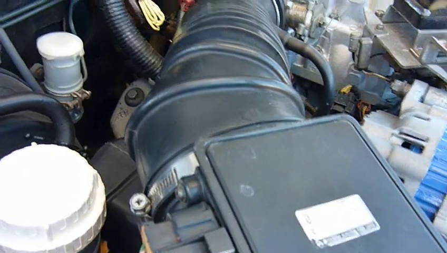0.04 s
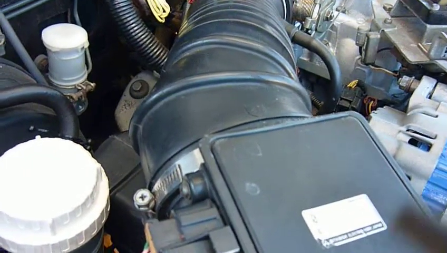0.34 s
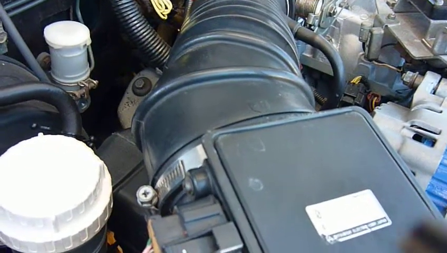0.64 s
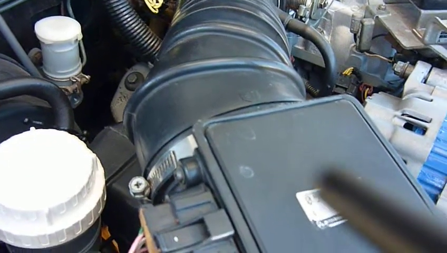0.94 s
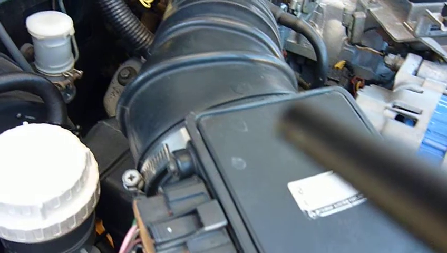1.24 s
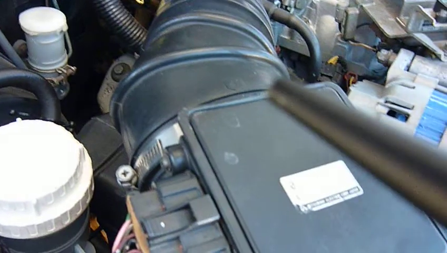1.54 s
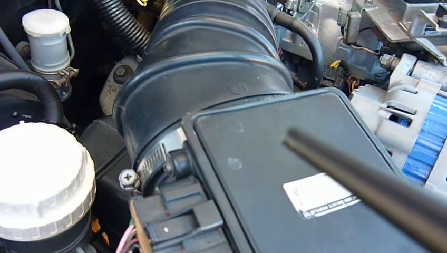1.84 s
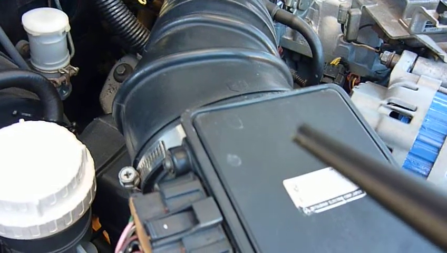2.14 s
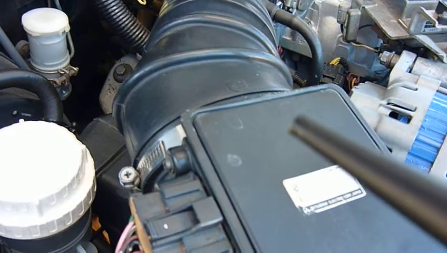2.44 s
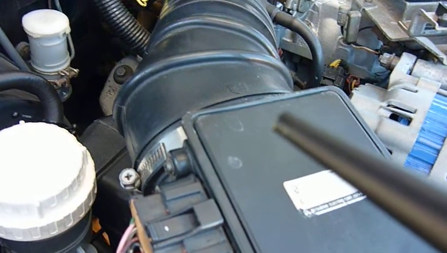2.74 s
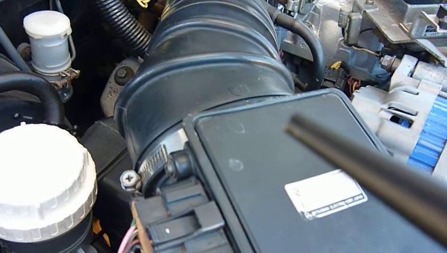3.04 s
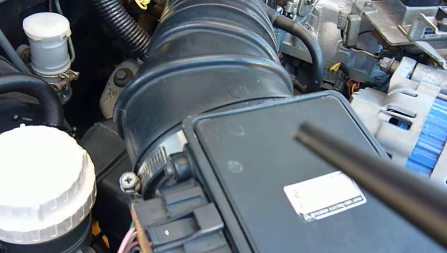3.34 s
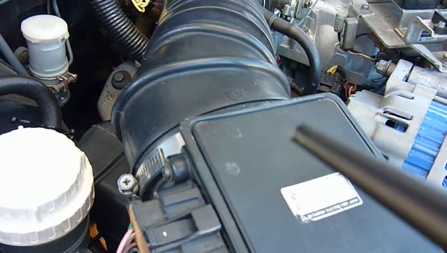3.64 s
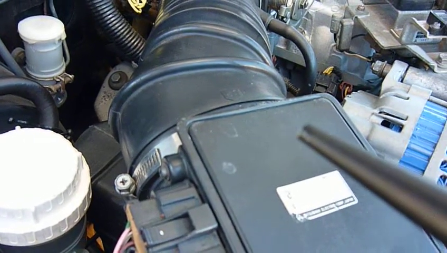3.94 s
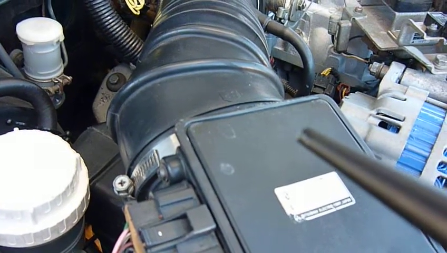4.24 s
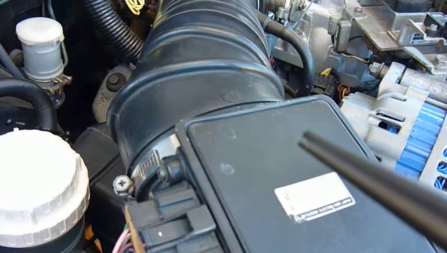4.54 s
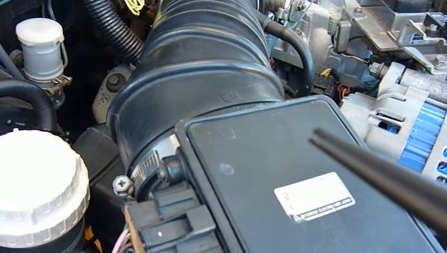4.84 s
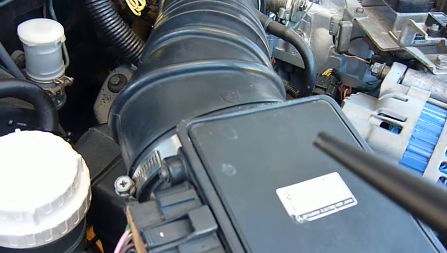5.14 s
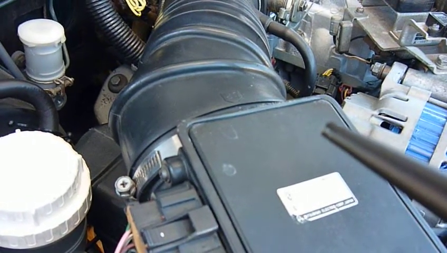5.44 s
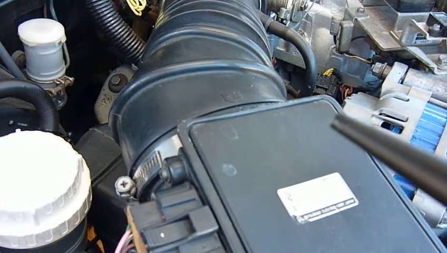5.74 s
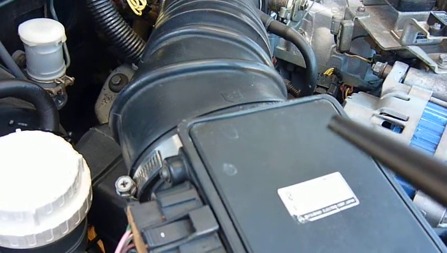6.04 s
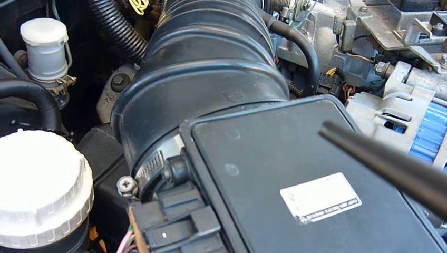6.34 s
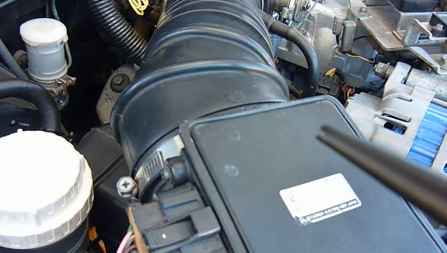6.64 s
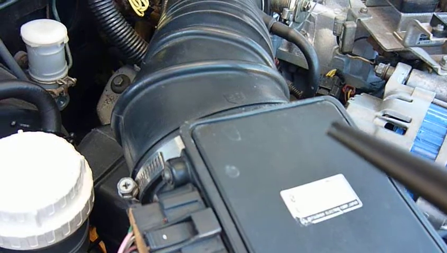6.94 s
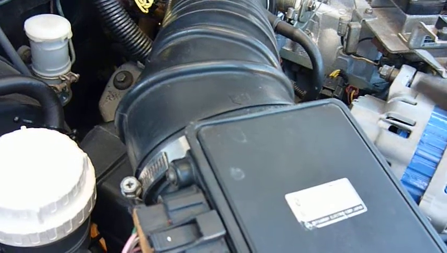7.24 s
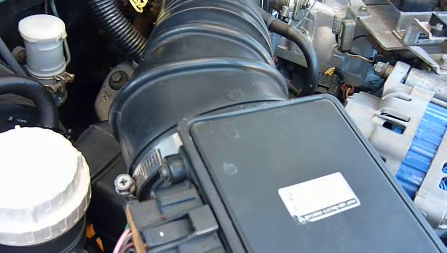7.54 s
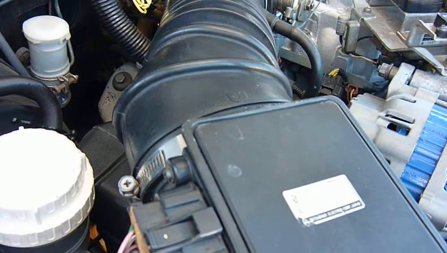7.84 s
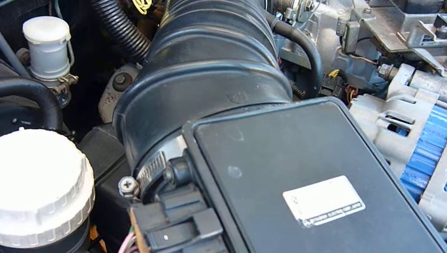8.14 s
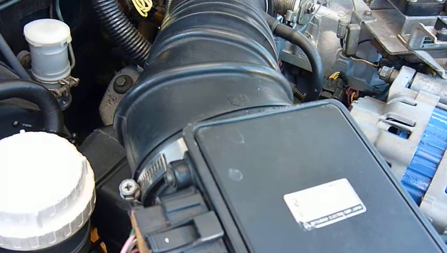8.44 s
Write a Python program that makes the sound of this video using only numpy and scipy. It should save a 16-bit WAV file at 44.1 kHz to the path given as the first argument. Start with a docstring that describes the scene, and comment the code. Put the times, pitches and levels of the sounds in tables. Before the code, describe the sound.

A stiff plastic tube is handled close up in a quiet workshop, over steady room hiss and a very faint, thin electronic whine. All the sounds are light. A small bright snap comes at 0.3 seconds, with two ticks just after. Faint ticks resume around 2 seconds. From 2.5 to 3.1 the grip creaks in a quick run of soft, low thuds with tiny squeaks, and a sharper snap stands out at 2.6. A faint low hum swells briefly at 2.4 and again near 3.8, where the hand makes one dull, fading rustle and the tube snaps again. Between 5.1 and 6.4 seconds about six crisp snaps follow at uneven intervals, with softer ticks between them. Sparse ticks continue, a clearer one at 7.7, and a quick cluster of snaps closes the sound at about 8.6 seconds.

```python
"""Squeezing a plastic sealant tube

A tube is handled above an engine bay in a quiet workshop. Its stiff wall rings with bright snaps
and duller ticks, the grip creaks in a short run of soft thuds, and the hand rustles once.
Underneath lie steady room hiss, a camera's thin electronic whine and a low hum that swells twice."""
import sys
import numpy as np
from scipy import signal
from scipy.fft import rfft, irfft
from scipy.io import wavfile

SR = 44100
rng = np.random.default_rng(int(sys.argv[2]) if len(sys.argv) > 2 else 0)


def master_out(mix):
    """Clip the mix to full scale and print it as 16-bit PCM to the path in sys.argv[1]."""
    frames = np.transpose(np.atleast_2d(mix))
    ceiling = np.clip(frames, -1, 1)
    pcm = np.round(ceiling * 32767).astype(np.int16)
    wavfile.write(sys.argv[1], SR, pcm)


N = 383229

# The modes of the tube's wall. Each row: pitch in Hz, base ring time (t60) in seconds,
# weight in a snap in dB, weight in a tick in dB.
WALL_MODES = [(1485, 0.048, -4, -1), (2040, 0.048, 3, 3), (2205, 0.022, -5, 5), (2355, 0.072, 3, -3),
              (2565, 0.012, -8, 0), (2810, 0.045, -2, -6), (3350, 0.016, -2, -2), (3495, 0.04, -21, -10),
              (3800, 0.097, 7, -10), (4315, 0.013, -4, -7), (4495, 0.02, -6, -11), (4850, 0.033, 13, -31),
              (5095, 0.018, 3, -4), (5525, 0.017, -5, -4), (5810, 0.137, 5, 0), (6085, 0.006, -3, -10),
              (6470, 0.04, 5, -7), (6615, 0.012, 0, -4), (7070, 0.018, 1, -3), (7525, 0.014, -1, -14)]


def gain_of(db):
    """Decibels to a factor."""
    return 10 ** (np.asarray(db) / 20)


def unit_rms(x):
    """Scales a sound to rms 1."""
    return x / np.sqrt(np.mean(x ** 2) + 1e-20)


def at_level(x, db):
    """Scales a short sound so that its energy, spread over 10 ms, has the given level."""
    return gain_of(db) * x / np.sqrt(np.sum(x ** 2) / 441 + 1e-20)


def add(mix, start, sound):
    """Lays a sound into the mix at start seconds."""
    part = mix[round(start * SR):][:len(sound)]
    part += sound[:len(part)]


def band(x, lo_hz, hi_hz, order=2):
    """Causal band-pass."""
    return signal.sosfilt(signal.butter(order, [lo_hz, hi_hz], "bandpass", fs=SR, output="sos"), x)


def ring(t, hz, t60):
    """A struck mode: a sine that falls 60 dB in t60 seconds."""
    return np.sin(2 * np.pi * hz * t) * gain_of(-60 * t / t60)


def three_band_eq(sound, levels_db):
    """Smoothly shapes a short sound toward the given low, middle and high levels, taken over 10 ms."""
    # The four edges of the three bands, in Hz.
    edges_hz = [1200, 3000, 5600, 8200]
    padded = 2 * len(sound)
    spectrum, hz = rfft(sound, padded), np.fft.rfftfreq(padded, 1 / SR)
    power = np.histogram(hz, edges_hz, weights=abs(spectrum) ** 2)[0] / (len(sound) * 441)
    centres_hz = np.convolve(edges_hz, [.5, .5], "valid")
    boost_db = np.interp(hz, centres_hz, levels_db - 10 * np.log10(power))
    return irfft(spectrum * gain_of(boost_db))[:len(sound)]


def room_hiss():
    """Steady room noise; its low part wavers and eases off slightly while the treble stays even."""
    # The colour of the room. Each row: frequency in Hz, relative noise density in dB.
    room_curve = [(25, -15.5), (60, -12), (90, -6), (150, -5.5), (200, -1), (250, -1.5), (420, -4),
                  (700, -7), (950, -8), (1200, -10.5), (1700, -12), (2800, -15.5), (5600, -18),
                  (6700, -18.5), (7800, -22.5), (8600, -36.5)]
    hz, t = np.fft.rfftfreq(N, 1 / SR), np.arange(N) / SR
    points_hz, points_db = np.transpose(room_curve)
    colour = gain_of(np.interp(np.log(hz + 1), np.log(points_hz), points_db))
    noise = unit_rms(irfft(rfft(rng.standard_normal(N)) * colour, N))
    low = irfft(rfft(noise) / (1 + (hz / 1600) ** 2), N)
    drift = sum(np.sin(2 * np.pi * (f * t + rng.random())) / np.sqrt(f) for f in np.geomspace(.5, 6, 20))
    low_db = 0.9 - 0.1164 * t + 0.16 * unit_rms(drift)
    return gain_of(-58) * (noise - low + low * gain_of(low_db))


def electronic_whine():
    """Thin steady tones from a camera's electronics."""
    # Each row: pitch in Hz, rms level in dB.
    tones = [(2665, -84.5), (3112, -82.5), (3558, -87), (5335, -88), (6223, -82.5), (6665, -80.5),
             (7709, -95), (8296, -107)]
    t = np.arange(N) / SR
    return sum(gain_of(db) * np.sqrt(2) * np.sin(2 * np.pi * (hz * t + rng.random())) for hz, db in tones)


def low_hum():
    """A low tone swells over a little rumble, sags in pitch and fades."""
    # Each row: start in seconds, length in seconds, level of the tone in dB.
    swells = [(2.40, 0.11, -60), (3.771, 0.293, -57.5)]
    rise_s, fall_s = 0.025, 0.037
    settled_hz, sag_hz = 194.6, 48
    out = np.zeros(N)
    for start, length, db in swells:
        t = np.arange(0, length, 1 / SR)
        envelope = gain_of(db) * np.clip(np.minimum(t / rise_s, (length - t) / fall_s), 0, 1)
        hz = settled_hz + sag_hz * np.exp(-t / (0.269 * length))
        tone = np.sqrt(2) * np.sin(2 * np.pi * np.cumsum(hz) / SR)
        rumble = unit_rms(band(rng.standard_normal(SR), 85, 296))[:len(t)]
        add(out, start, envelope * (tone + gain_of(-2.5) * rumble))
    return out


def hand_rustle():
    """The hand shifts: a dull rub that starts quickly and dies away."""
    rise_s, decay_s = 0.015, 0.39
    out, t = np.zeros(N), np.arange(SR) / SR
    envelope = gain_of(-61) * np.minimum(t / rise_s, 1) * np.exp(-t / decay_s)
    rub = unit_rms(band(rng.standard_normal(SR), 650, 1400))
    add(out, start=3.755, sound=envelope * rub)
    return out


def skin_squeak(t, db):
    """A tiny squeak of skin on plastic, at a slightly different pitch each time."""
    tone = ring(t, hz=1550 * (1 + 0.018 * rng.standard_normal()), t60=0.028)
    return at_level(tone * (1 - np.exp(-t / .0015)), db)


def grip_creak():
    """The grip slips in steps, each a heavily damped low thud with a tiny squeak and a soft rub."""
    # Slips of the grip. Each row: start in seconds, relative level in dB.
    slips = [(2.467, -50.5), (2.536, -50.5), (2.591, -51.5), (2.658, -51.5), (2.724, -53), (2.732, -47),
             (2.797, -48), (2.84, -47), (2.922, -51.5), (2.977, -52.5), (3.027, -53.5), (3.079, -51),
             (3.127, -50)]
    # Squeaks without a thud. Each row: start in seconds, level in dB.
    lone_squeaks = [(2.517, -55.5), (2.565, -56.5)]
    out, t = np.zeros(N), np.arange(SR // 10) / SR
    for start, db in slips:
        pitch = 1 + 0.15 * rng.standard_normal()
        thud = band(ring(t, hz=340 * pitch, t60=0.021) + 0.24 * ring(t, hz=202, t60=0.072), 150, 1100)
        rub = band(rng.standard_normal(len(t)), 180, 750, order=1) * np.exp(-t / 0.033)
        add(out, start, at_level(thud, db - 2) + skin_squeak(t, db - 12.5) + at_level(rub, db - 11.5))
    for start, db in lone_squeaks:
        add(out, start, skin_squeak(t, db))
    return out


def pinpricks(per_s=3, size_db=-41, spread_db=3):
    """Tiny dry ticks, too weak to ring the wall, come at random while the tube is held."""
    sizes = gain_of(size_db + spread_db * np.clip(rng.standard_normal(N), -2, 2))
    impulses = sizes * (rng.random(N) < per_s / SR)
    return band(impulses, 2500, 7500)


def faint_ticks(first_s=1.8, last_s=8.4, per_s=1.1, db=-61, spread_db=1.5):
    """The tube's smallest shifts, as random rows of start, relative level and brightness."""
    span_s = last_s - first_s
    draws = rng.random((round(per_s * span_s), 3))
    return [(first_s + when * span_s, db + spread_db * (2 * size - 1), spread_db * (2 * colour - 1))
            for when, size, colour in draws]


def looseness_db(start):
    """Lift of the longest mode: none in the firm working grip, some in the loose hold before and after."""
    return 0 if 1 < start < 8.45 else 4


def wall_click(weights_db, bands_db, ring_scale, detune, room_t60):
    """The wall's modes ring once, and the surroundings scatter a faint tail."""
    t = np.arange(SR // 5) / SR
    hz, t60 = np.transpose(WALL_MODES)[:2, :, None]
    hz = hz + detune / t60 * rng.standard_normal(hz.shape)  # the grip shifts damped modes most
    age = np.maximum(t - 0.000617 * rng.random(hz.shape), 0)  # bending waves arrive at different moments
    modes = (gain_of(weights_db)[:, None] / t60 * ring(age, hz, t60 * ring_scale)).sum(0)
    tail = band(rng.standard_normal(len(t)), 1800, 7500) * gain_of(-60 * t / room_t60)
    tail *= 1 - np.exp(-t / 0.0029)
    click = at_level(modes, db=0) + at_level(tail, db=-11.5)
    return three_band_eq(click, bands_db)  # where the wall gives way sets the colour


def tube_wall():
    """Snaps under pressure and lighter ticks as the tube shifts ring the same modes with different weights."""
    # Snaps of the wall. Each row: start in seconds, relative level in dB, brightness in dB.
    snaps = [(0.2879, -42, 1.5), (2.6453, -37.5, 1.5), (2.693, -45.5, -.5), (3.8818, -41, 1),
             (4.0497, -56, -4), (5.126, -39, 0), (5.4407, -42, .5), (5.92, -39, .5), (6.043, -42, -5),
             (6.2534, -42, 0), (6.4328, -44, -1.5), (8.5341, -40.5, 0.5), (8.5848, -51, -3),
             (8.6576, -44.5, -0.5)]
    # Ticks of the wall. Each row: start in seconds, relative level in dB, brightness in dB.
    ticks = [(0.5117, -43.5, -.5), (0.6105, -45.5, 0), (1.9385, -55.5, -1), (2.1046, -57, -2),
             (2.2435, -52.5, 0.5), (2.388, -51, -3.5), (3.27, -56.5, 0.5), (3.4855, -57.5, -0.5),
             (4.1029, -52.5, 2.5), (4.751, -52, 2), (4.8876, -58.5, -2), (5.0459, -60.5, -6),
             (5.5189, -56, 1), (5.712, -57, 1), (5.7663, -55.5, 2), (6.188, -55.5, 3), (6.7006, -56.5, 3),
             (7.238, -53, 1), (7.294, -57, 1), (7.6739, -46, -2.5), (7.9548, -55.5, -8.5), (8.17, -54, 4.5),
             (8.3537, -52.5, 0)]
    snap_colour_db, tick_colour_db = np.array([-7.5, 0, -2.5]), np.array([1.5, 0, -1])  # low, middle, high
    tilt = np.array([-1, 0, 1])  # brightness trades the low band for the high one
    t60, snap_weights_db, tick_weights_db = np.transpose(WALL_MODES)[1:]
    sustain = t60 / t60.max()  # a loose hold favours the modes that ring longest
    out = np.zeros(N)
    for start, db, bright_db in snaps:
        weights_db = snap_weights_db + looseness_db(start) * sustain
        bands_db = db + snap_colour_db + bright_db * tilt
        add(out, start, wall_click(weights_db, bands_db, ring_scale=0.78, detune=0.2, room_t60=0.073))
    for start, db, bright_db in ticks + faint_ticks():
        weights_db = tick_weights_db + looseness_db(start) * sustain
        bands_db = db + tick_colour_db + bright_db * tilt
        ring_scale = 0.95 + 0.1 * looseness_db(start)  # ticks ring longer in a loose hold
        add(out, start, wall_click(weights_db, bands_db, ring_scale, detune=0.65, room_t60=0.057))
    return gain_of(-5) * band(out, 1280, 8200, order=6)  # the small wall radiates little bass or top


def scene():
    """The tube and the hand, close up and in mono, over the workshop's background."""
    handling = tube_wall() + pinpricks() + grip_creak() + hand_rustle()
    return (handling + room_hiss() + electronic_whine() + low_hum())[None]


def record(dry):
    """The converter adds a constant offset and cuts the top treble steeply."""
    offset, cutoff_hz = -.046, 8700
    low_pass = signal.firwin(511, cutoff_hz, window=("kaiser", 9), fs=SR)
    return signal.oaconvolve(dry + offset, low_pass[None], "same")


dry = scene()
out = record(dry)
master_out(out)
```